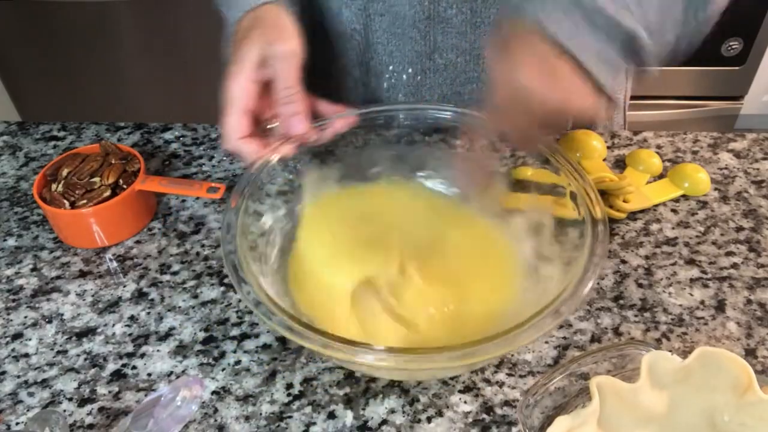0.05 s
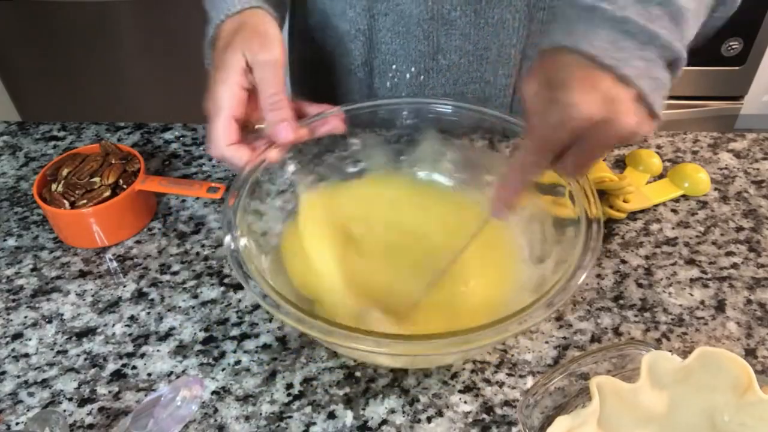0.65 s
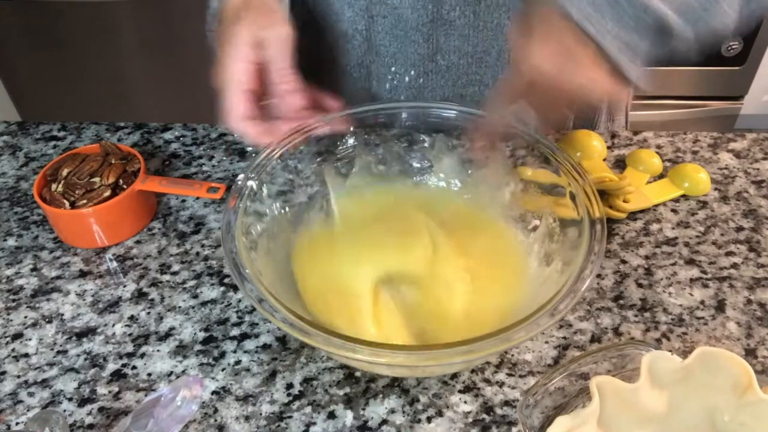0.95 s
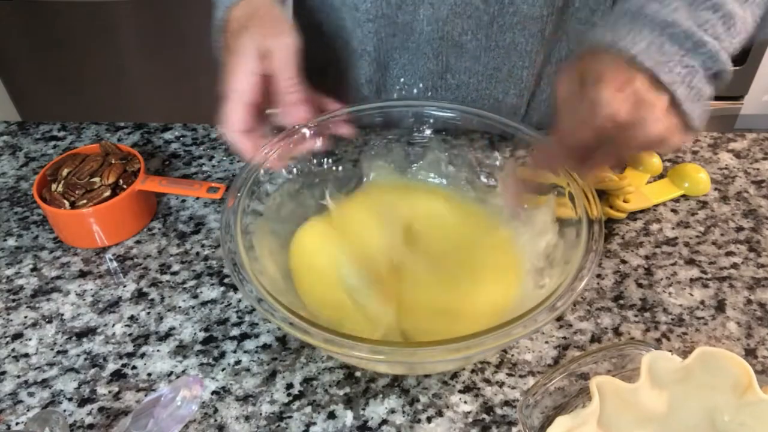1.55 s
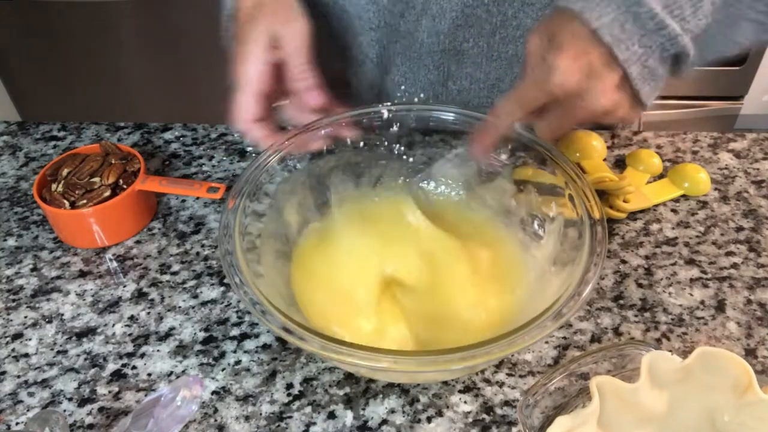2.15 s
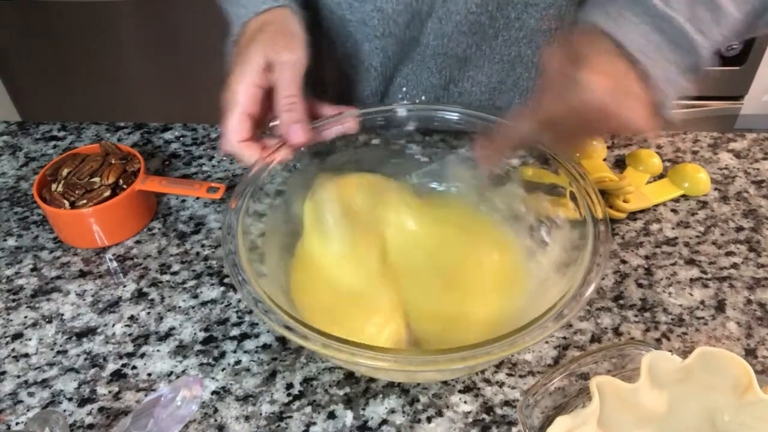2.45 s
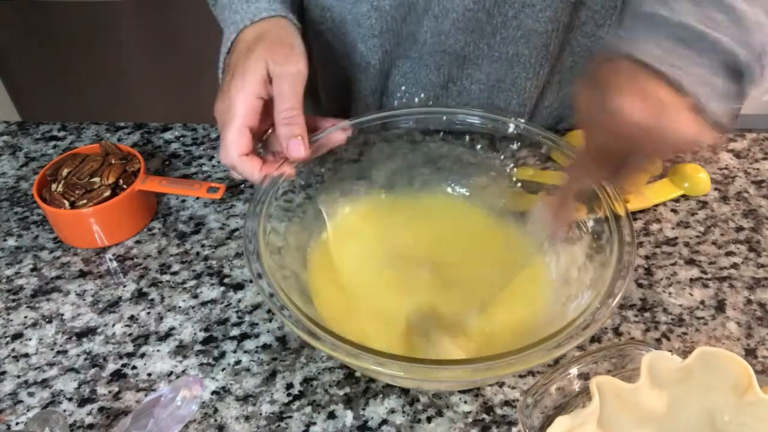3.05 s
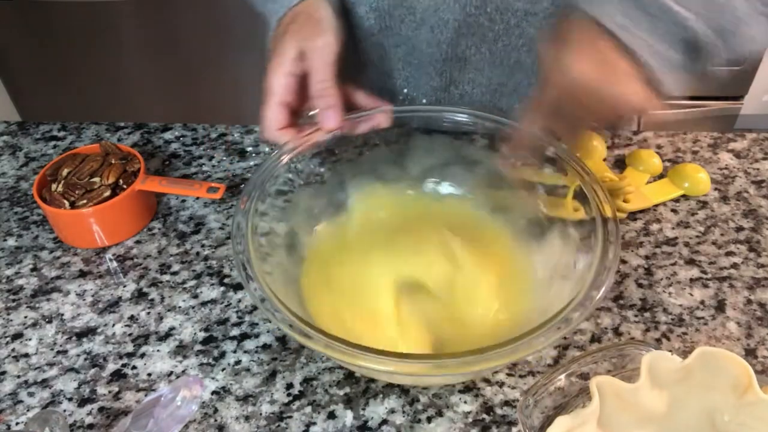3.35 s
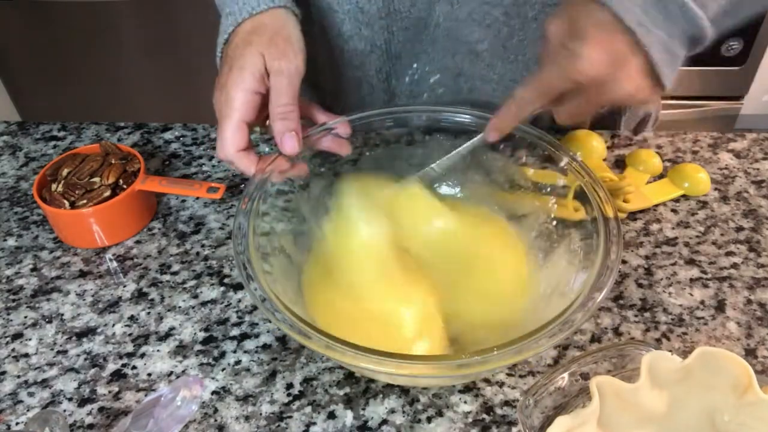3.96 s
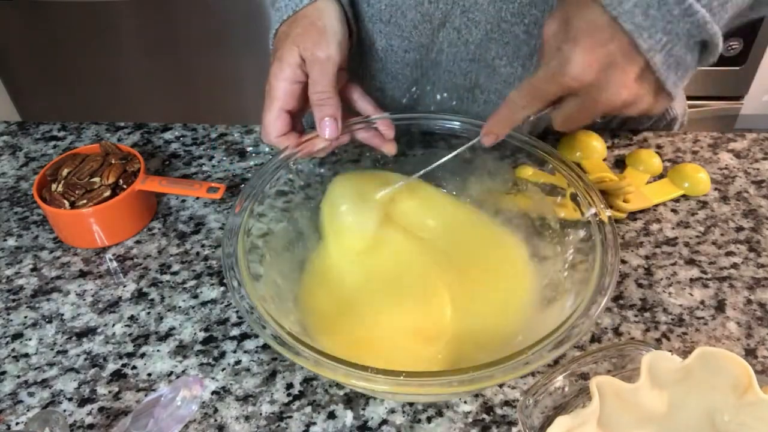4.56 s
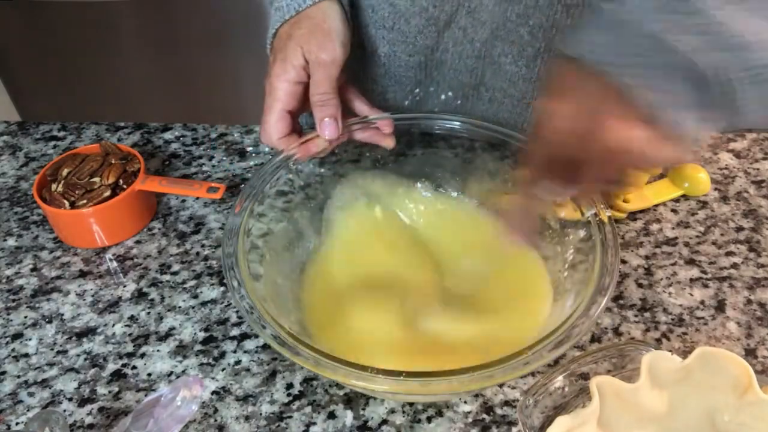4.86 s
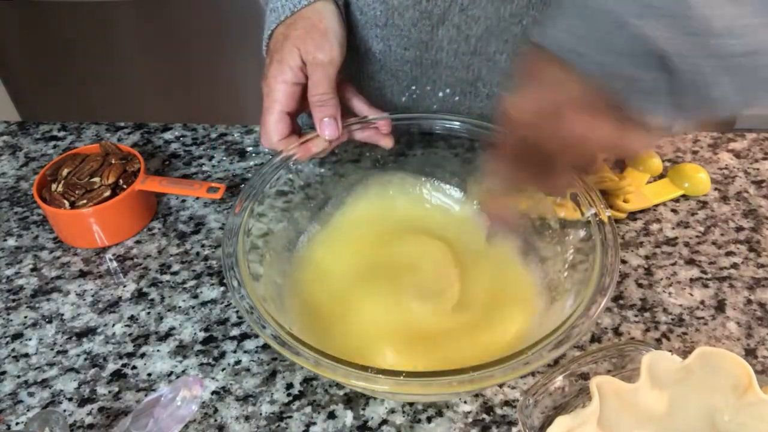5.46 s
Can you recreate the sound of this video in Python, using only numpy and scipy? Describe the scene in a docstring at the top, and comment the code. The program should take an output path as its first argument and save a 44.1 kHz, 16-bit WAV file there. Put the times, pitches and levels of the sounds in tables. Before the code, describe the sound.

A fork beats a runny egg mixture in a glass bowl, about four wet, plopping strokes a second, with light clinks at first. The bowl knocks on the stone counter, and the beating carries on. Then the fork strikes the glass hard, the bowl knocks again, and the strokes ease into quiet stirring. It is heard up close in a small kitchen with a faint hum.

```python
"""A fork beats runny egg filling in a glass bowl on a stone counter, about four strokes a second.
Each stroke slaps out wet snaps and air pockets that plop with a falling pitch; at first the tines also
clink and squeak on the glass. Two seconds in, the bowl knocks on the counter. At four seconds the fork
strikes the glass once, hard, the bowl knocks again, and the beating eases into a gentle stir.
A small kitchen answers throughout, over a faint hum."""
import sys
import numpy as np
from scipy import signal
from scipy.fft import rfft, irfft, next_fast_len
from scipy.io import wavfile
from scipy.ndimage import map_coordinates

SR = 44100
rng = np.random.default_rng(int(sys.argv[2]) if len(sys.argv) > 2 else 0)


def persist_wave(psi):
    """Save psi, clipped to +-1, as 16-bit WAV."""
    counts = np.round(np.clip(psi, -1, 1) * 32767).astype(np.int16)
    wavfile.write(sys.argv[1], SR, np.atleast_2d(counts).T)


N = 251490
TIME = np.arange(N) / SR

# the fork slaps in, tears out, then drags through the froth: (time [s], time in the liquid [s],
# entry snap [dB], exit snap [dB], spray over body [dB], crispness [0-1], entry bubble [Hz],
# entry pocket [dB], exit pocket [dB], drag lag [s], relative fizz [dB], relative slosh [dB])
FORK_STROKES = [(.034, 0.0081, -33.5, -28.5, -10, 0.4, 3360, -52, -25, .05, -72, -56),
                (0.1601, 0.013, -36.5, -34.5, -6, 0.9, 3370, -60, -35, .04, -78, -62),
                (0.245, 0.014, -32.5, -35.5, -7, 0.7, 1220, -24, -29, 0.066, -61, -54),
                (0.4537, .015, -30, -35, -6, 0.84, 3870, -29.5, -26, 0.095, -68, -63),
                (0.6769, 0.022, -31, -36, -1.5, 0.57, 3770, -24, -39, 0.055, -63, -46),
                (0.9014, 0.011, -37, -33, -7, .25, 1360, -51, -26, 0.037, -76, -49),
                (1.1351, 0.012, -34.5, -38, -8.5, 0.5, 1270, -34, -30, 0.13, -66, -63),
                (1.3793, 0.02, -33, -43, -5.5, .7, 1400, -47, -46, 0.056, -78, -52),
                (1.602, 0.011, -39, -33, -7.5, 0.66, 4100, -58, -29.5, 0.099, -71, -52.5),
                (1.8339, 0.016, -39, -38, -5.5, 0.71, 1330, -37.5, -29.5, 0.091, -64, -55),
                (2.0857, .0132, -34, -53, -9.5, 0.44, 1390, -36, -25.5, .06, -83, -65),
                (2.3121, 0.0065, -46, -37, -9.5, .8, 1290, -29.5, -44, 0.053, -83, -46),
                (2.5521, 0.028, -38.5, -42, -9, 0.25, 1390, -39.5, -28, 0.082, -57.5, -47),
                (2.801, 0.0077, -40.5, -37, -3.5, 0.8, 4300, -45, -32, .1, -67, -53),
                (3.0398, 0.018, -35.5, -41.5, -7.5, 0.56, 1270, -30, -35, 0.068, -68, -56.5),
                (3.2806, .021, -46, -42.5, -7.5, .4, 1340, -38.5, -54, 0.093, -63, -52.5),
                (3.545, .0298, -41, -50.5, -9, 1, 1270, -36.5, -54, .13, -66.5, -55.5),
                (3.8204, 0.021, -39, -47, -13.5, .85, 1360, -34.5, -57, .04, -69.5, -63.5),
                (4.379, 0.026, -60, -69, -2, 0.07, 2690, -47, -60, 0.0097, -63, -57),
                (4.725, 0.068, -63.5, -65, -4, 0.12, 1405, -49, -50, 0.087, -76, -66),
                (4.97, .0418, -55, -57.5, -1, 0.5, 1310, -48.5, -58, 0.037, -75, -62.5),
                (5.1309, 0.024, -53.5, -52.5, -4.5, 0.2, 1310, -58, -52, 0.029, -71.5, -60),
                (5.275, 0.051, -57, -60, -7, 0.3, 1314, -52, -70, 0.032, -74, -60),
                (5.4069, .0064, -52, -59.5, -2, 0.16, 1700, -62, -51, 0.057, -72, -60.5),
                (5.552, 0.02, -54, -47.5, -15, 0, 1310, -60, -54, .05, -69.5, -62.5)]
# the filling folds shut over the fork's trough with a smack and a gulp: (time [s], gulp [dB],
# final pitch [Hz], t60 [s], smack [dB], spray [dB], crispness [0-1], bubble [Hz])
FOLDS = [(.295, -38.5, 305, 0.017, -64, -68, 0, 1300), (.4095, -41, 710, 0.043, -55, -70, .2, 1870),
         (.7627, -36.5, 740, 0.0098, -66, -70, .2, 1400), (.8096, -39.5, 356, 0.027, -57, -62, .2, 1400),
         (1.0352, -31, 320, 0.012, -51, -66, 0.6, 3320), (1.2135, -33, 680, 0.052, -48, -72, .2, 1500),
         (1.2735, -23, 362, 0.016, -33, -61, 1, 4140), (1.507, -23, 295, 0.037, -44, -71, 0.8, 3430),
         (1.7304, -42, 278, 0.015, -46, -77, 1, 1380), (1.7804, -40.5, 703, 0.046, -70, -77, .3, 1400),
         (1.97, -31.5, 350, .071, -38.5, -51, 0.94, 1430), (2.195, -33, 335, 0.074, -48, -74, .95, 3430),
         (2.4462, -34.5, 676, 0.029, -48.5, -54, .75, 3930),
         (2.6784, -33.5, 334, 0.026, -45, -70, 0.7, 2060),
         (2.932, -25.5, 307, .069, -45.5, -68, 0.73, 1400),
         (3.1765, -30.5, 334, 0.06, -38.5, -57, 0.95, 1480),
         (3.338, -38, 308, 0.077, -46.5, -70, 0.2, 1300), (3.429, -35, 343, 0.087, -40, -48, 0.4, 3500),
         (3.6602, -50, 340, 0.024, -47, -60.5, 0.2, 2710)]
# tone of a snap's body, the liquid film tearing: (frequency [Hz], level [dB])
FILM_SPECTRUM = [(250, -38), (600, 9.5), (1000, -1), (1350, 0), (1900, -4.5), (2600, -5.5), (3600, -4.5),
                 (5000, -9.5), (7500, -39)]
# bright sizzle of spray and froth: (frequency [Hz], level [dB])
SPRAY_SPECTRUM = [(2500, -23.5), (5000, -3.5), (6500, -6), (7350, 1.5), (8200, -8), (9400, -6), (10500, -5),
                  (11800, -8.5), (13500, -3.5), (15500, -9.5), (17000, -27.5)]
# low gurgle of the dragged liquid: (frequency [Hz], level [dB])
SLOSH_SPECTRUM = [(120, -21), (330, 10.5), (520, -0.5), (740, 5), (1000, -1.5), (1300, 5.5), (2000, -2.5),
                  (4000, -8.5)]

# fork hits on the glass: (time [s], relative level [dB], hardness as cut-off [Hz])
GLASS_HITS = [(0.131, -27.5, 5900), (.342, -39.5, 5500), (.547, -38, 4950), (.768, -41, 4500),
              (4.1091, -10, 15000), (4.665, -49, 11000), (4.9697, -70, 8000), (5.0102, -54, 9000),
              (5.4075, -60, 8000), (5.5732, -48, 8000), (5.6858, -46.5, 12100)]
# ring of the bowl and the fork: (frequency [Hz], level [dB], t60 [s])
GLASS_MODES = [(2456, -9.5, 0.063), (2950, -7.5, .012), (3713, -5.5, 0.024), (3843, -5, 0.046),
               (5250, -9, .012), (5410, -14.5, 0.056), (6700, -4.5, .013), (7080, -3, 0.029),
               (7250, -10, .025), (7770, -6.5, .02), (8440, -7.5, 0.034), (8950, -11.5, .025),
               (10000, -15, .03), (10530, -6.5, .035), (11170, 0, 0.014), (12750, -9, 0.012),
               (14600, -9, .015)]
# a tine rubs the glass: (time [s], level [dB], half-length [s])
TINE_RUBS = [(0.135, -48.5, 0.006), (0.362, -63, 0.0074), (0.578, -53, 0.0094)]
# the bowl's foot hits the counter: (time [s], level [dB], contact time [s])
COUNTER_HITS = [(2.1145, -7, 0.0006), (2.194, -40, .0002), (2.3484, -22, 0.0015), (4.1121, -24.5, 0.00062),
                (4.124, -18.5, 0.0014)]
# ring of the loaded bowl on the counter: (frequency [Hz], level [dB], t60 [s])
FOOT_MODES = [(160.6, -25, 0.3), (344.5, -20.5, 0.19), (474, -19, 0.16), (615, -13.5, .05),
              (670, -13, 0.08), (940, -1, 0.022), (1243, -4.5, 0.031), (1325, -17, 0.11), (1460, -7, 0.022),
              (1880, -11, .018), (2360, -10, 0.018)]
# crack of glass on stone: (frequency [Hz], level [dB])
STONE_SPECTRUM = [(40, -42), (130, -4), (350, 7), (700, 15), (1400, -10), (2500, -3), (4000, -12.5),
                  (8000, -12.5), (15000, -27)]
# chatter of the settling foot: (frequency [Hz], level [dB])
CHATTER_SPECTRUM = [(50, -40), (150, -1), (250, 3), (480, 3), (700, 12), (1000, -5.5), (1400, 0),
                    (2000, -7), (4000, -44)]

# the kitchen's reverb time: (frequency [Hz], t60 [s])
KITCHEN_DECAY = [(150, 0.54), (500, 0.61), (1500, 0.69), (4000, 0.59), (8000, 0.51), (15000, 0.27)]
# hum of the appliances: (frequency [Hz], level [dB])
APPLIANCE_TONES = [(59, -72.5), (119, -75), (146, -78.5)]
# room tone: (frequency [Hz], level [dB])
AIR_SPECTRUM = [(15, -51), (25, -14), (127, 1), (335, -4.5), (516, -8), (695, -9), (1100, -12), (1260, -15),
                (2160, -19), (3720, -22.5), (6050, -27.5), (7110, -28), (8360, -32.5), (14800, -35),
                (16000, -37.5)]


def wet_contacts(graze_lead_s=.0065, graze_db=-14, graze_crispness=.2, drop_db=-12.5, drop_within_s=.024,
                 exit_bubble_hz=1337, small_bubble_hz=2900, spray_tilt_db=1.25):
    """Cues for the snaps: (time [s], body [dB], spray [dB], crispness [0-1], bubble [Hz])."""
    cues = []
    for s, stay, entry_db, exit_db, spray_db, crisp, entry_hz, *_ in FORK_STROKES:
        exit_hz = exit_bubble_hz * np.exp(.028 * rng.standard_normal())
        spray_in, spray_out = spray_db - spray_tilt_db, spray_db + spray_tilt_db
        # the tines graze the surface, slap in and tear out
        graze = entry_db + graze_db
        cues.append((s - graze_lead_s, graze, graze + spray_in, graze_crispness, small_bubble_hz))
        cues.append((s, entry_db, entry_db + spray_in, crisp, entry_hz))
        cues.append((s + stay, exit_db, exit_db + spray_out, crisp, exit_hz))
        # two flung drops land just after the slap
        drop = (entry_db + exit_db) / 2 + drop_db
        for flight in drop_within_s * rng.random(size=2):
            cues.append((s + flight, drop, drop + spray_db, crisp, small_bubble_hz))
    return cues + [(s, *smack) for s, _, _, _, *smack in FOLDS]


def snaps(crack_t60=.004, tear_t60=.034, squelch_s=.00373, squelch_db=-11, bubble_db=6, bubble_q=5):
    """Each wet snap squelches up, cracks and tears away in tiny bursts; a trapped bubble colours it."""
    preroll, attack = SR // 60, SR // 220
    out, t = np.zeros(N), np.arange(-preroll, 2 * preroll) / SR
    after = np.maximum(t, 0)
    crack_power = fade(after, crack_t60) ** 2 / crack_t60
    tear_power = fade(after, tear_t60) ** 2 / tear_t60
    film = coloured(rng.standard_normal(N), FILM_SPECTRUM)
    spray = froth()
    for s, body_db, spray_db, crisp, hz in wet_contacts():
        stretch = rng.integers(N - len(t)) + np.arange(len(t))
        crisp = np.clip(crisp, 0, .95)
        # a clean crack comes with less squelch ahead of it
        squelch = amp(squelch_db) * np.sqrt((1 - crisp) / tear_t60) * np.exp(np.minimum(t, 0) / squelch_s)
        envelope = np.where(t < 0, squelch, np.sqrt(crisp * crack_power + (1 - crisp) * tear_power))
        body = filtered(film[stretch] * envelope,
                        lambda f: 1 + amp(bubble_db) * resonance(f, hz, hz / bubble_q))
        for burst, db in ((body, body_db), (spray[stretch] * envelope, spray_db)):
            attack_rms = np.sqrt(np.mean(burst[preroll:][:attack] ** 2))
            add(out, s - preroll / SR, amp(db) * burst / attack_rms)
    return out


def air_pockets(pocket_hz=703, pocket_growth_s=.00048, pocket_t60=.028, exit_pitch_ratio=.96,
                trough_hz=341, trough_growth_s=.00099, trough_t60=.07, trough_lag_s=.00443, trough_db=-7,
                gulp_lag_s=.001226, gulp_growth_s=.00047):
    """Cues for the plops: (time [s], level [dB], final pitch [Hz], growth time [s], t60 [s])."""
    cues = []
    for s, stay, slap_db, _, _, _, _, entry_db, exit_db, *_ in FORK_STROKES:
        cues.append((s, entry_db, pocket_hz, pocket_growth_s, pocket_t60))
        # tearing out opens a slightly larger, lower pocket
        cues.append((s + stay, exit_db, pocket_hz * exit_pitch_ratio, pocket_growth_s, pocket_t60))
        # the whole trough sounds under each entry
        cues.append((s + trough_lag_s, slap_db + trough_db, trough_hz, trough_growth_s, trough_t60))
    return cues + [(s + gulp_lag_s, db, hz, gulp_growth_s, t60) for s, db, hz, t60, *_ in FOLDS]


def plops(glide=1.39, bowl_db=-25):
    """An air pocket opens behind the fork, dropping in pitch as it grows; the push rings the bowl."""
    out, t = np.zeros(N), np.arange(SR // 6) / SR
    for s, level, hz, growth, t60 in air_pockets():
        opened = 1 - np.exp(-t / growth)
        envelope = opened * fade(t, t60)
        wobble = .05 * waver(t, 300)  # the pocket's soft wall shakes
        phase = hz * (t + glide * growth * opened) + wobble
        pocket = envelope / envelope.max() * np.sin(2 * np.pi * phase)
        bowl = sum(fade(t, life) * np.sin(2 * np.pi * (f * t + rng.random()))
                   for f, _, life in FOOT_MODES[:3])
        add(out, s, amp(level) * (pocket + amp(bowl_db) * opened * bowl / 2))
    return out


def swishes(half_length_s=.036, trim_db=-1, clump_db=3.5, clumps_per_s=60):
    """Froth fizzes and liquid gurgles in uneven clumps as the fork drags through, once a stroke."""
    fizz_envelope, slosh_envelope = np.zeros(N), np.zeros(N)
    t = np.arange(SR // 4) / SR - 1 / 8
    swell = np.exp(-.5 * (t / half_length_s) ** 2)
    for s, *_, lag, fizz_db, slosh_db in FORK_STROKES:
        add(fizz_envelope, s + lag + t[0], amp(fizz_db) * swell)
        add(slosh_envelope, s + lag + t[0], amp(slosh_db) * swell)
    fizz = fizz_envelope * froth()
    slosh = slosh_envelope * coloured(bubbles(1100, per_s=450, cycles=6, spread=.6), SLOSH_SPECTRUM)
    return amp(trim_db + clump_db * waver(TIME, clumps_per_s)) * (fizz + slosh)


def froth():
    """A dense, bright sizzle of tiny bubbles."""
    return coloured(bubbles(9000, per_s=4000, cycles=12), SPRAY_SPECTRUM)


def bubbles(hz, per_s, cycles, spread=.364, size_db=4):
    """A cloud of bubbles, each ringing a few cycles at its own pitch and size."""
    count = int(per_s * N / SR)
    onsets = (rng.random(count) * N).astype(int)
    pitch = np.clip(hz * np.exp(spread * rng.standard_normal(count)), 150, SR / 2.6)
    gain = amp(size_db * np.minimum(rng.exponential(size=count), 2))
    samples = np.arange(int(3 * cycles * SR / hz))
    age = pitch[:, None] * samples / SR / cycles
    rings = gain[:, None] * age * np.exp(-4 * age) * np.sin(2 * np.pi * cycles * age)
    return np.bincount((onsets[:, None] + samples).ravel(), rings.ravel(), N)[:N]


def clinks(tick_db=-8, tick_t60=.016, splash_db=-21, splash_t60=.14, trim_db=-5):
    """Steel on glass: a tick, a ring the filling soon damps, shaken froth; a cushioned hit is duller."""
    out, t = np.zeros(N), np.arange(SR // 3) / SR
    for s, level, cutoff_hz in GLASS_HITS:
        ring = np.zeros(len(t))
        for hz, db, t60 in GLASS_MODES:
            phase = hz * t + rng.random() + .08 * waver(t, 120)  # moving liquid loads the glass
            ring += amp(db) * fade(t, t60) * np.sin(2 * np.pi * phase)
        tick = amp(tick_db) * fade(t, tick_t60) * rng.standard_normal(len(t))
        splash = noise_burst(t, splash_db, splash_t60, SPRAY_SPECTRUM)
        hit = filtered(ring + tick + splash, lambda hz: 1 / np.sqrt(1 + (hz / cutoff_hz) ** 4))
        add(out, s, amp(level + trim_db) * hit)
    return out


def squeaks(mode_hz=5384, width_hz=110):
    """Wet friction under a tine feeds one mode of the glass for an instant."""
    swell = sum(amp(db) * np.exp(-.5 * ((TIME - s) / half) ** 2) for s, db, half in TINE_RUBS)
    return swell * unit(filtered(rng.standard_normal(N), lambda hz: resonance(hz, mode_hz, width_hz) ** 2))


def knocks(crack_db=-6, crack_t60=.025, chatter_db=-19, chatter_t60=.27):
    """The bowl rocks onto the stone: a crack, a low ring and a short chatter as its foot settles."""
    out, t = np.zeros(N), np.arange(SR // 2) / SR
    for s, level, contact in COUNTER_HITS:
        ring = sum((-1) ** k * amp(db) * fade(t, t60) * np.sin(2 * np.pi * hz * t)
                   for k, (hz, db, t60) in enumerate(FOOT_MODES))
        crack = noise_burst(t, crack_db, crack_t60, STONE_SPECTRUM)
        chatter = noise_burst(t, chatter_db, chatter_t60, CHATTER_SPECTRUM)
        attack = 1 - np.exp(-t / contact)
        add(out, s, amp(level) * (ring + crack + chatter) * attack)
    return out


def kitchen(send, predelay_s=.0054):
    """Diffuse reverb, with a fresh tail every third of a second as the hands and the liquid move."""
    out, block = np.zeros(N), SR // 3
    for i in range(0, N, block):
        hz, t, noise = signal.stft(rng.standard_normal(SR * 2 // 3), SR, nperseg=256)
        decay = fade(t, along(KITCHEN_DECAY, hz)[:, None])
        tail = signal.istft(noise * decay, SR, nperseg=256)[1]
        add(out, i / SR + predelay_s, signal.fftconvolve(send[i:i + block], tail / np.linalg.norm(tail)))
    return out


def room_tone(air_db=-60):
    """A steady bed of room air and appliance hum."""
    hum = sum(amp(db) * np.sqrt(2) * np.sin(2 * np.pi * (hz * TIME + rng.random()))
              for hz, db in APPLIANCE_TONES)
    return hum + amp(air_db) * coloured(rng.standard_normal(N), AIR_SPECTRUM)


def amp(db):
    """Decibels to gain."""
    return 10 ** (np.asarray(db) / 20)


def unit(x):
    """x at rms 1."""
    return x / np.sqrt(np.mean(x ** 2) + 1e-20)


def along(points, hz):
    """Read a curve of (frequency [Hz], value) on a log axis."""
    f, v = np.transpose(points)
    return np.interp(np.log(hz + 1), np.log(f + 1), v)


def filtered(x, response):
    """x through a frequency response."""
    size = next_fast_len(len(x) + SR // 4)
    return irfft(rfft(x, size) * response(np.fft.rfftfreq(size, 1 / SR)), size)[:len(x)]


def coloured(x, spectrum):
    """x through an EQ curve, at rms 1."""
    return unit(filtered(x, lambda hz: amp(along(spectrum, hz))))


def resonance(hz, centre, width):
    """A resonant band-pass with unit gain at its centre."""
    return 1j * hz * width / (centre ** 2 - hz ** 2 + 1j * hz * width)


def fade(t, t60):
    """Exponential decay, 60 dB in t60."""
    return np.exp(-np.log(1000) * t / t60)


def noise_burst(t, db, t60, spectrum):
    """Coloured noise that dies away."""
    return amp(db) * fade(t, t60) * coloured(rng.standard_normal(len(t)), spectrum)


def waver(t, rate):
    """Smooth random modulation, rate points a second."""
    return map_coordinates(rng.standard_normal(int(t[-1] * rate) + 4), [t * rate])


def add(track, s, sound):
    """Mix a sound into the track at time s."""
    i = int(np.clip(round(s * SR), 0, N))
    track[i:i + len(sound)] += sound[:N - i]


def scene(low_cut_hz=110):
    """Liquid and bowl up close, the kitchen behind them; so small a bowl radiates no deep bass."""
    wet, pockets, glass, foot = snaps() + swishes(), plops(), clinks() + squeaks(), knocks()
    reverb = kitchen(amp(-12.5) * wet + amp(-11) * pockets + amp(-15.5) * glass + amp(-14) * foot)
    low_cut = signal.butter(3, low_cut_hz, "high", fs=SR, output="sos")
    return (signal.sosfilt(low_cut, wet + pockets + glass + foot + reverb) + room_tone())[None]


def record(dry, high_cut_hz=16500):
    """One microphone with a steep high cut."""
    return np.array([filtered(channel, lambda hz: 1 / (1 + (hz / high_cut_hz) ** 160)) for channel in dry])


dry = scene()
out = record(dry)
persist_wave(out)
```